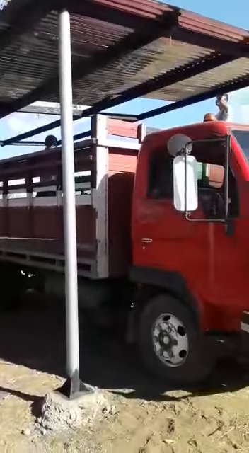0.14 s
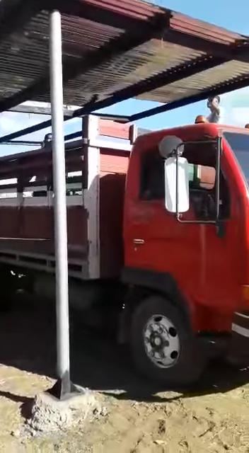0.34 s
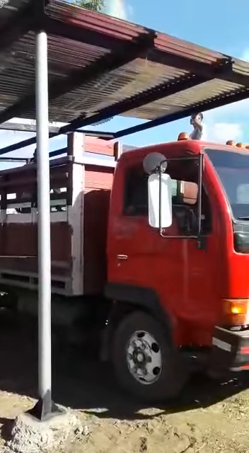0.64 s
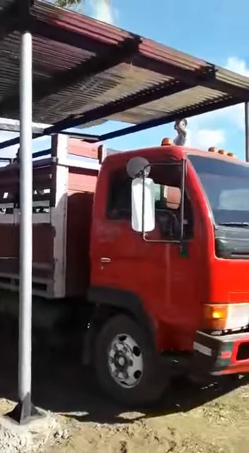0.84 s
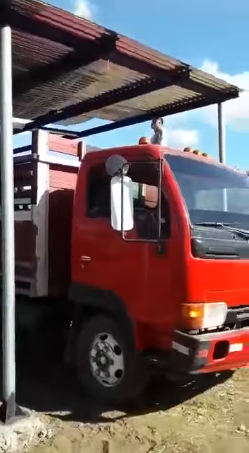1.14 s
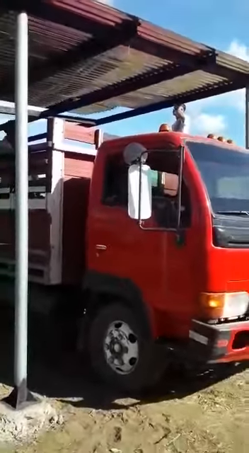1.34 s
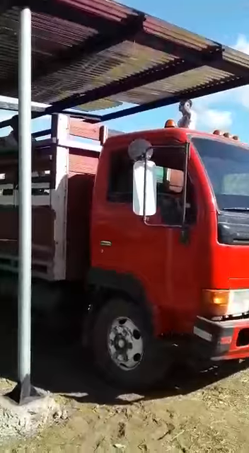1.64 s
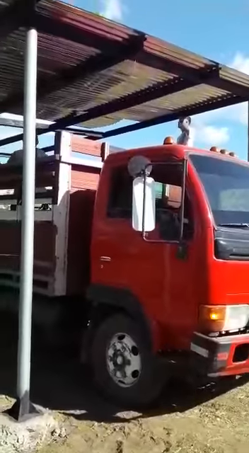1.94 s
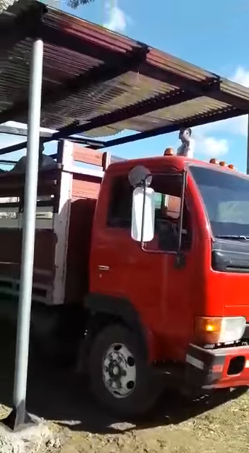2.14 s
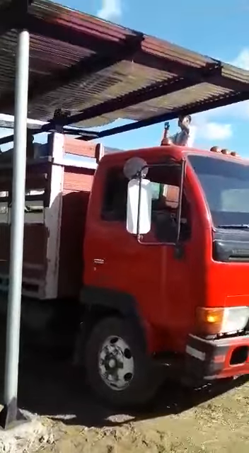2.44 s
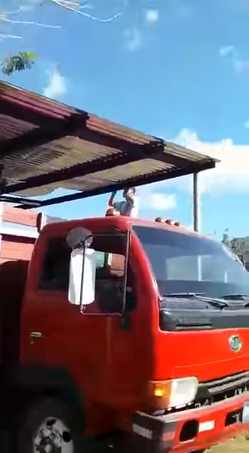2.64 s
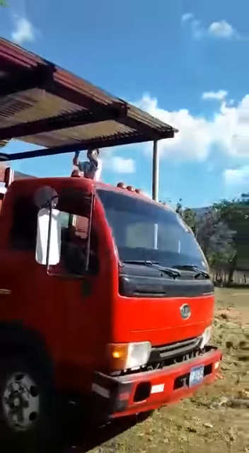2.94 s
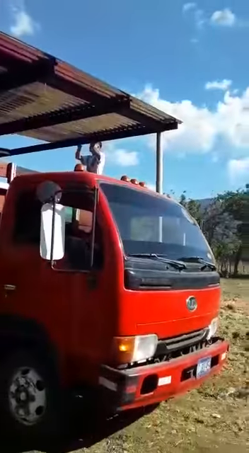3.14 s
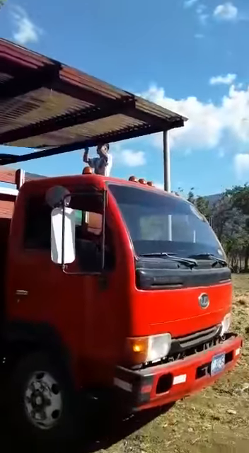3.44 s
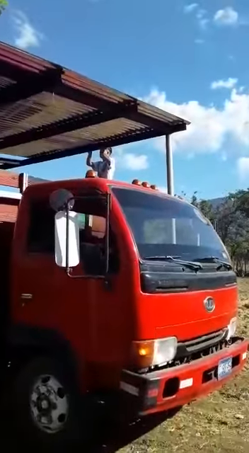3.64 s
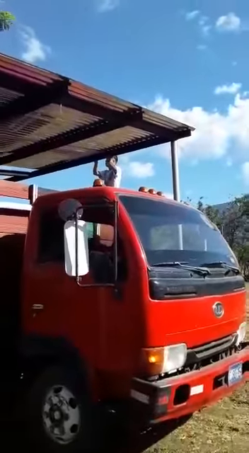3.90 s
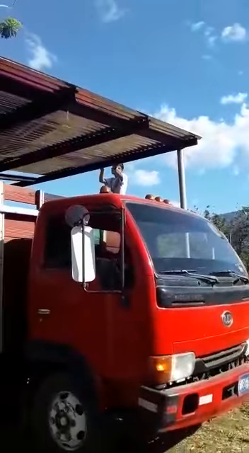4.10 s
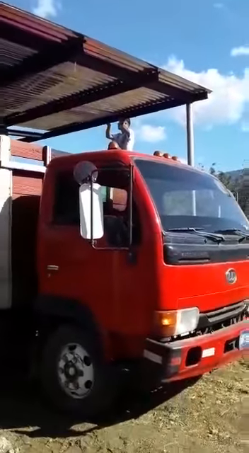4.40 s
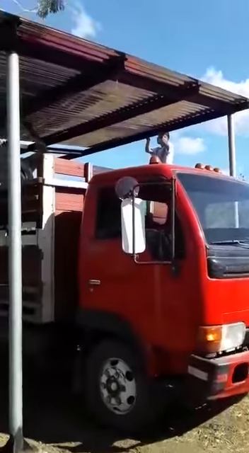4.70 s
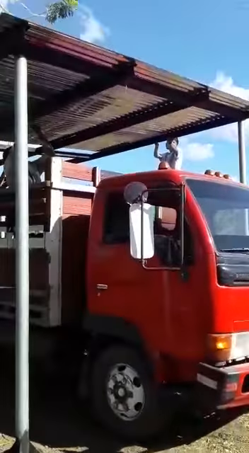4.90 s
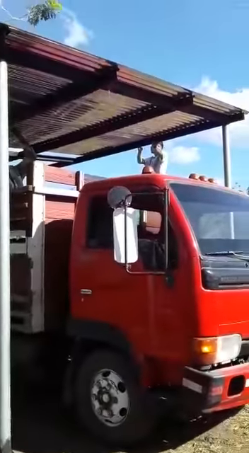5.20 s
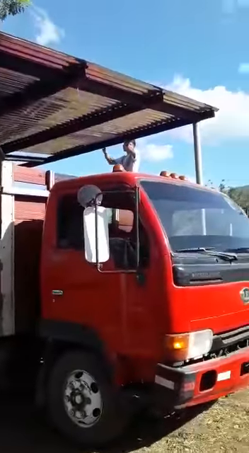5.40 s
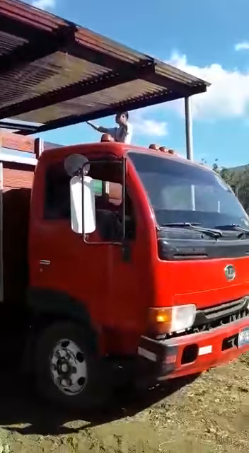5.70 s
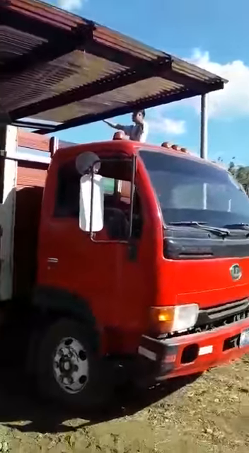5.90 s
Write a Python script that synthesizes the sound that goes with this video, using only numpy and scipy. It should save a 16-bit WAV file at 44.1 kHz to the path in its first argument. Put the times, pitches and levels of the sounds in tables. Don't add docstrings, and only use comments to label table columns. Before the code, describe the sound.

Outdoors, a truck's load drags raspily along corrugated metal with wind puffs, until a sheet buckles with a violent bang and clatters down.

```python
import sys
import numpy as np
from scipy import signal
from scipy.fft import irfft
from scipy.io import wavfile

SR = 44100
rng = np.random.default_rng(int(sys.argv[2]) if len(sys.argv) > 2 else 0)


def invert_db(level):
    return 10 ** (np.asarray(level, dtype=float) / 20)


def unload_audio(sound):
    columns = np.transpose(np.atleast_2d(sound))
    steps = np.round(np.clip(columns, -1, 1) * 32767)
    wavfile.write(sys.argv[1], SR, steps.astype(np.int16))


N = 266884
TIME = np.arange(N) / SR

# [peak t/s, level/dB, length/s]
GUSTS = [(0.0, -50, 0.88), (0.275, -45.5, 0.5), (0.43, -48, 0.098), (0.514, -47, 0.14), (0.9, -52.5, .6),
         (1.07, -43, 0.21), (1.433, -44.5, 0.29), (1.922, -40, 0.1), (2.1, -54.5, 0.19), (2.265, -51, 0.16),
         (2.507, -52.5, 0.061), (2.73, -57.5, 0.3), (2.922, -64, 0.18), (3.18, -66, .15),
         (3.417, -60.5, 0.43), (3.6, -40, 0.056), (4.2, -61, 1.1), (4.47, -60, 0.32), (4.67, -56.5, 0.28),
         (4.92, -61, 0.3), (5.138, -57, 0.3), (5.448, -54.5, 0.24), (5.747, -53, 0.17), (5.922, -50, 0.05),
         (5.975, -52, 0.15)]
# [t/s, level/dB]
BREEZE = [(0.0, -57), (0.55, -45), (0.7, -64), (1.14, -53), (1.8, -56), (2.28, -47), (2.6, -60), (3.5, -69),
          (4.4, -70.5), (4.7, -60), (5.4, -80), (6.05, -76)]
# [t/s, peak level/dB, f/Hz]
POPS = [(0.134, -34.5, 150), (0.164, -38, 150), (0.22, -37, 110), (0.286, -32, 220), (0.297, -32, 160),
        (0.42, -31, 150), (0.521, -31, 200), (1.878, -42, 240), (1.908, -32, 200), (2.066, -41, 110),
        (2.111, -39, 120), (2.175, -40, 139), (2.193, -42, 150), (2.26, -39, 110), (2.282, -37, 110),
        (2.324, -44, 130)]

# [t/s, peak level/dB, f/Hz]
PINGS = [(0.9, -36, 2730), (0.914, -34, 1385), (0.925, -29.5, 2690), (0.961, -35, 1700), (0.982, -29, 1667),
         (1.21, -36, 2180), (1.32, -32.5, 2190), (1.59, -41, 2260), (4.235, -48, 5540), (4.285, -45, 4250),
         (4.325, -51, 2130), (4.35, -45, 2700), (5.911, -53, 1830)]
# [t/s, peak level/dB, f/Hz]
HUMS = [
    (0.397, -32, 140),
    (1.0, -27, 261),
    (1.189, -40, 254),
    (1.71, -34.5, 270),
    (3.601, -20, 250),
    (3.602, -26, 156),
    (3.779, -20, 236),
]
# [t/s, peak level/dB, f/Hz]
KNOCKS = [(0.524, -30, 245), (0.54, -35, 300), (0.86, -30, 805), (1.505, -32.5, 800), (1.62, -32, 790),
          (0.999, -26, 730), (2.195, -49, 2060), (2.59, -48, 524), (3.355, -43, 560), (3.572, -37, 574),
          (3.597, -11.5, 905), (3.6, -9.5, 560), (4.619, -40, 520), (4.794, -41, 524), (5.119, -34.5, 587),
          (5.21, -35.5, 694), (5.629, -38, 537)]
# [t/s, peak level/dB, f/Hz]
SLAPS = [(1.067, -28, 7200), (1.292, -37, 5330), (1.598, -32, 2880), (2.965, -34, 3260), (3.11, -36, 7600),
         (3.15, -29.5, 3220), (3.243, -31, 3370), (3.462, -38, 3200), (3.609, -6, 4270),
         (3.616, -11.5, 4800), (3.647, -25, 7600), (3.815, -15, 4370), (3.956, -26.5, 4800),
         (4.088, -31, 7850), (4.447, -41, 3180)]
# [t/s, peak level/dB, f/Hz]
RATTLES = [
    (5.911, -30.5, 4260),
    (5.923, -33, 4400),
    (5.944, -37.5, 4400),
    (6.021, -42, 3900),
]
# [t/s, peak level/dB, f/Hz]
SPILLS = [
    (4.09, -37, 12940),
    (4.162, -50.5, 14500),
    (4.207, -39, 13800),
    (5.51, -52, 14500),
    (5.54, -48, 14000),
    (5.575, -42, 14500),
    (5.61, -49, 14000),
    (5.65, -48, 14500),
    (5.7, -52, 14500),
    (1.375, -38, 13500),
]
# [t/s, peak level/dB, f/Hz]
CLICKS = [
    (2.535, -48, 10600),
    (5.774, -32.5, 4150),
    (5.836, -35, 14000),
    (5.9114, -49, 3000),
    (5.97, -46, 9600),
    (6.005, -40, 9400),
]
# [t/s, peak level/dB, f/Hz]
CRACKS = [
    (2.6378, -28.5, 7800),
    (5.875, -37, 7700),
    (5.981, -39, 8600),
    (6.033, -44, 5150),
]
# [t/s, peak level/dB, f/Hz]
SHOWERS = [(0.6, -33, 8500), (1.293, -36, 8500), (1.372, -30, 10000), (4.517, -43, 10200),
           (0.325, -39, 9000), (0.716, -37, 9000), (2.901, -46, 11000), (3.241, -40, 8000),
           (4.46, -47, 7800), (4.778, -41, 10000), (4.865, -49, 8000)]
# [t/s, peak level/dB, f/Hz]
HOPS = [
    (0.0862, -45, 7040),
    (0.158, -50, 9000),
    (0.181, -54, 12000),
    (0.2284, -54, 12560),
    (2.7077, -59, 12000),
    (5.964, -45, 8000),
    (6.012, -48, 11500),
    (6.022, -46, 5960),
]
# [band width/octaves, t60/s]
BURST_KINDS = [(0.092, 0.19), (0.29, 0.17), (0.79, 0.08), (0.31, 0.16), (0.6, 0.031), (0.49, 0.14),
               (0.54, 0.003), (3.6, 0.0031), (1.7, 0.15), (0.64, .012), (1.4, 0.024)]
# [t/s, peak level/dB, f/Hz, t60/s]
SNAPS = [(3.594, -7, 560, .09), (3.618, -11, 610, .08), (3.638, -9, 720, .08), (3.648, -15.5, 245, 0.13),
         (3.651, -13, 560, .08), (3.63, -4, 3100, .01), (3.641, -2.5, 3000, .012), (3.674, -7, 3600, .006),
         (3.684, -7, 2100, .04), (3.686, -9, 3260, 0.045), (3.974, -31, 190, 0.15), (4.005, -27, 650, .08),
         (4.1, -32, 605, 0.086), (0.444, -28, 250, 0.032), (0.459, -37, 270, 0.035),
         (0.47, -28.5, 2390, .05), (0.543, -29.5, 300, 0.021), (0.553, -27, 2300, .02),
         (1.57, -32, 3200, .12), (1.631, -30, 3600, 0.18), (2.592, -38, 500, .04), (2.92, -38, 520, 0.073),
         (4.209, -40, 328, 0.068), (3.51, -42, 3000, .12), (3.53, -44, 560, .12), (1.022, -23, 780, .06),
         (1.055, -25, 850, .07), (3.62, -7, 3060, .07), (3.648, -7, 3040, .06), (5.915, -43, 140, .45),
         (3.3, -45, 12000, .18), (3.36, -50, 11500, .18), (1.145, -29.5, 480, 0.074),
         (3.83, -18.5, 740, .08)]

# [low f/Hz, high f/Hz]
REGIONS = [(80, 970), (970, 1950), (1950, 5000), (5000, 8950), (8950, 16000)]
BLENDS = [.1, .1, .1, .5, .05, .05]
# [f/Hz, width/Hz, level/dB]
PANEL = [(263, 26, 3), (560, 5.4, -1.5), (721, 30, -1.5), (1100, 120, 4.5), (2670, 120, 0.5),
         (3740, 200, 3)]
# [f/Hz, t60/s]
RING = [(150, 0.58), (500, 0.3), (1200, 0.42), (3000, 0.27), (8000, 0.26), (15000, 0.21)]

# [f/Hz, level/dB per Hz]
FIRST_SHEET_COLOUR = [(88, -45), (150, -8.5), (209, -15.5), (259, 0.5), (361, -11), (805, -2.5),
                      (1060, -13.5), (1480, -6.5), (1830, -11), (2270, -2.5), (3300, -11.5), (4600, -17.5),
                      (5680, -21), (6600, -14), (7920, -10.5), (8700, -19), (9820, -17.5), (12700, -13.5),
                      (16000, -19)]
# [f/Hz, level/dB per Hz]
SECOND_SHEET_COLOUR = [(120, -22), (200, 0.5), (358, -7.5), (534, 2), (630, -6), (702, 3.5), (923, -11.5),
                       (1150, -6.5), (1620, -10.5), (2130, -7), (3360, -4.5), (4400, -13), (6000, -14),
                       (7000, -13.5), (8000, -11), (9200, -18.5), (10300, -13.5), (12500, -13.5),
                       (15800, -16)]
# [peak t/s, rasp level/dB, rise/s, fall/s, grit level/dB re rasp]
FIRST_STROKES = [(0.0, -50, .01, 0.14, -23.5), (0.09, -55.5, .05, 0.13, -2), (0.17, -57, 0.14, 0.066, -16),
                 (0.264, -62, 0.031, 0.33, 2), (0.33, -49, 0.01, 0.2, -2), (0.38, -44, 0.17, 0.43, -25),
                 (0.449, -32.5, 0.0072, 0.093, -5), (0.5, -36, 0.2, 0.67, -8),
                 (0.615, -39.5, 0.098, 0.11, -4), (0.72, -46.5, 1, 0.96, 2), (0.864, -45, .006, .08, -4),
                 (0.96, -38.5, 0.31, 0.34, -5.5), (1.01, -34, 0.084, 0.26, -10.5),
                 (1.075, -35.5, 0.053, 0.2, -6), (1.2, -38, 0.11, 0.48, -7), (1.32, -38, .2, 0.21, -7),
                 (1.385, -34, 0.034, 0.37, -4.5), (1.601, -30.5, 0.18, 0.22, -6),
                 (1.95, -55, 0.32, 0.19, -20), (2.1, -66, 0.32, 0.19, -2), (2.197, -48, 0.015, 0.45, -17),
                 (2.29, -50.5, 0.031, 0.53, -2.5), (2.406, -58, 0.27, 0.4, -7),
                 (2.55, -53, 0.67, 0.16, -18)]
# [peak t/s, rasp level/dB, rise/s, fall/s, grit level/dB re rasp]
SECOND_STROKES = [(2.77, -56.5, 0.04, .3, -1.5), (2.85, -49, 0.095, 0.22, -3),
                  (2.908, -43.5, 0.06, 0.49, -5), (2.994, -41, 0.23, 0.35, -10.5),
                  (3.112, -39, 0.013, 0.33, -0.5), (3.154, -37.5, 0.043, 0.18, -1),
                  (3.247, -42.5, 0.074, 0.25, -5), (3.299, -53, 0.23, 0.23, -4),
                  (3.4, -47, 0.29, 0.16, -14.5), (3.466, -43.5, 0.009, 0.19, -14.5),
                  (3.566, -49, 0.075, 0.89, -13), (4.188, -41, 0.11, 0.16, -6.5), (4.21, -46, .1, 0.15, -1),
                  (4.3, -46, 0.21, 0.3, -7), (4.37, -54, .15, 0.36, -10), (4.465, -47, 0.048, 0.18, -5.5),
                  (4.53, -45, 0.057, 0.47, -4.5), (4.624, -39.5, 0.13, 0.34, -8.5),
                  (4.72, -47.5, 0.12, 0.15, -11), (4.8, -44, .06, 0.17, -5), (4.87, -47.5, 0.027, 0.16, -8),
                  (5.0, -58, 0.27, 0.09, -25), (5.084, -45, 0.059, 0.33, -6),
                  (5.42, -46.5, 0.14, 0.54, -14), (5.6, -50, 0.31, 0.35, -1.5), (5.77, -55, .5, 0.053, -7),
                  (5.88, -55.5, 0.13, 0.15, -4.5), (5.911, -45.5, 0.0067, 0.091, -10),
                  (6.0, -59, .2, 0.36, -1)]
# [t/s, peak level/dB]
SNAGS = [(0.257, -34), (0.324, -39.5), (0.4455, -26), (0.716, -27), (0.794, -30), (0.861, -24),
         (1.178, -33), (2.273, -39), (2.511, -46), (2.89, -36), (3.104, -31), (3.241, -32), (3.37, -36),
         (3.461, -39), (4.161, -22.5), (4.612, -34), (4.865, -44), (5.063, -49), (5.386, -33)]
# [peak t/s, level/dB, rise/s, fall/s]
JOLTS = [(0.0, -45.5, .01, 0.34), (0.33, -45, 0.19, 0.65), (0.455, -32, 0.028, 0.3), (0.7, -40, 0.77, 0.44),
         (1.005, -30.5, 0.01, 0.2), (1.06, -31, .05, .2), (1.2, -36, .04, 0.14), (1.25, -33.5, 0.45, 0.94),
         (1.55, -39.5, 0.51, 0.35), (1.725, -41.5, .05, 0.11), (1.82, -41.5, 0.15, 0.11),
         (1.91, -60, 0.041, 0.13), (1.999, -49, 0.17, 0.15), (2.3, -46.5, 0.12, 0.1),
         (2.51, -46, 0.17, 0.11), (2.62, -51, 0.13, 0.091), (2.93, -41.5, 0.13, 0.26),
         (3.17, -49, 0.083, 0.16), (3.39, -43.5, 0.065, 0.074), (3.565, -55, 0.13, 1.1),
         (4.19, -44, 1.87, 0.47), (4.5, -56, .3, .3), (4.63, -40, 0.025, 0.27), (4.76, -41.5, 0.34, 0.31),
         (5.0, -58, 0.23, 0.21), (5.1, -45.5, 0.055, 0.39), (5.23, -48.5, 0.29, 0.15),
         (5.45, -49.5, 0.21, 0.28), (5.64, -51, 0.072, 0.28), (5.9, -55, 0.18, 0.45)]
# [peak t/s, level/dB, rise/s, fall/s]
DUST_SLIDE = [
    (5.6, -63, 0.13, 0.26),
    (5.85, -81, 0.28, .7),
]
# [t/s, rib level/dB re rasp]
RIB_LEVEL = [(0.0, 0), (0.25, -5), (0.45, -5.5), (0.8, -6), (0.99, -4), (1.05, -6), (1.3, -8), (1.75, -11),
             (2.2, -4.5), (2.7, -11.5), (3.15, -12), (3.5, -9.5), (4.2, -9.5), (4.65, -8.5), (5.1, -8.5),
             (5.45, -3.5), (5.75, -6), (6.05, -4)]
# [t/s, beam level/dB]
BEAM_LEVEL = [(0.0, -1.5), (0.5, -1.5), (1.1, 0.5), (1.55, -2), (1.75, -2.5), (2.0, 0.5), (2.15, -9),
              (2.45, -3.5), (2.75, -3), (2.9, -1), (3.3, 1.5), (4.3, 0.5), (5.2, 1.5), (6.05, -4)]
BEAM_BAND = [190, 420]

# [f/Hz, level/dB per Hz]
CRASH_COLOUR = [(53, -67), (90, -17), (239, -3), (353, -8), (499, 0.5), (600, -0.5), (706, 2.5),
                (915, -12.5), (1160, -5.5), (1440, -10.5), (1800, -11.5), (2150, -6), (2760, -4),
                (3400, -3.5), (3910, -7.5), (4600, -13.5), (6870, -16.5), (8000, -15.5), (9930, -26.5),
                (16000, -26.5)]
# [peak t/s, force level/dB, rise/s, fall/s, boom level/dB re force]
FOLDS = [(3.5859, -8.5, .0007, 0.025, 7.5), (3.5963, -3, 0.0032, 0.0072, 7),
         (3.614, -9.5, 0.015, 0.065, 6.5), (3.645, -5.5, 0.049, 0.099, 2), (3.665, -9, .02, 0.054, -10),
         (3.69, -6, 0.068, 0.053, -4.5), (3.724, -7, 0.11, 0.028, 1.5), (3.757, -14, 0.018, 0.042, 1.5),
         (3.79, -16, .1, 0.078, 2.5), (3.817, -14.5, 0.023, 0.082, 5), (3.87, -21.5, 0.15, 0.17, 5),
         (3.96, -22.5, 0.076, 0.04, 3), (4.08, -33.5, 0.33, 0.065, 3.5), (4.15, -45.5, 0.11, 0.33, 9)]
# [f/Hz, level/dB, t60/s]
FREE_MODES = [(513, -10.5, 0.68), (1194, -18, 0.36), (1220, -22, 5.0), (2061, -3.5, 0.12),
              (2395, -27.5, 0.27), (2710, -16.5, 0.69), (2890, -19, 0.26), (3050, -28, 0.81),
              (3163, -22, 0.5), (3690, -19, 0.51), (3520, -25.5, 1.4), (3920, -24, 0.9), (4500, -24, 0.31),
              (4770, -27, 0.39)]

NEXT_SHEET_S, FIRST_SNAG_S = 2.68, 0.257


def rms_one(x):
    return x / np.sqrt(np.mean(x ** 2) + 1e-20)


def in_time(rows):
    s, *columns = np.transpose(rows)
    return [np.interp(TIME, s, column) for column in columns]


def at_hz(points, hz):
    f, value = np.transpose(points)
    return np.interp(np.log(hz), np.log(f), value)


def drift(hz):
    r = np.exp(-2 * np.pi * hz / SR)
    wander = signal.lfilter([1], [1, -2 * r, r * r], rng.standard_normal(N + SR))
    return rms_one(wander[SR:])


def swells(s, db, rise_s, fall_s):
    roundness = 1.034
    coarse = TIME[::16]
    late = coarse - s[:, None]
    away = np.where(late < 0, -late / rise_s[:, None], late / fall_s[:, None])
    power = invert_db(2 * (db[:, None] - 20 * np.minimum(away, 8) ** roundness))
    return np.interp(TIME, coarse, np.sqrt(power.sum(axis=0)))


def wind():
    s, db, length_s = np.transpose(GUSTS)
    breeze = invert_db(in_time(BREEZE)[0])
    noise = rng.standard_normal((2, N)) * invert_db(2.3 * drift(35))
    puff_band = signal.butter(2, [85, 200], "band", fs=SR, output="sos")
    buffet_band = signal.butter(2, [50, 90], "band", fs=SR, output="sos")
    puffs = rms_one(signal.sosfilt(puff_band, noise[0]))
    buffet = rms_one(signal.sosfilt(buffet_band, noise[1]))
    lull_db = -14
    puff_level = swells(s, db, length_s, 0.79 * length_s) + invert_db(lull_db) * breeze
    return puff_level * puffs + breeze * buffet


def bursts(rows, octaves):
    length = 8192
    out = np.zeros(N + length)
    for s, db, hz, t60 in rows:
        noise = rng.standard_normal(length) * invert_db(-60 * TIME[:length] / t60)
        edges = np.minimum(hz * 2 ** (octaves * np.array([-.5, .5])), [15000, 16200])
        burst = signal.sosfilt(signal.butter(2, edges, "band", fs=SR, output="sos"), noise)
        out[round(s * SR):][:length] += invert_db(db) * burst / np.abs(burst).max()
    return out[:N]


def small_blows():
    kinds = [PINGS, HUMS, KNOCKS, SLAPS, RATTLES, SPILLS, CLICKS, CRACKS, SHOWERS, HOPS, POPS]
    out = np.zeros(N)
    for rows, (octaves, t60) in zip(kinds, BURST_KINDS):
        out += bursts([(s, db, hz, t60) for s, db, hz in rows], octaves)
    return out


def snaps():
    return bursts(SNAPS, octaves=0.49)


def contacts(per_s, spread_db):
    sizes = invert_db(spread_db * np.minimum(rng.exponential(1, N), 4)) * rng.choice([-1, 1], N)
    return rms_one(sizes * (rng.random(N) < per_s / SR))


def mode(drive, hz, t60):
    r, w = invert_db(-60 / (t60 * SR)), 2 * np.pi * hz / SR
    return signal.lfilter([0, np.sin(w)], [1, -2 * r * np.cos(w), r * r], drive + 1e-18)


def sheet(colour, damping, size):
    hz, t = (np.arange(size // 2 + 1) + 1) * SR / size, np.arange(size) / SR
    lift_db = sum(db / (1 + (2 * (hz - f) / width) ** 2) for f, width, db in PANEL)
    shape = invert_db(at_hz(colour, hz) + lift_db)
    regions = []
    for (low, high), below, above in zip(REGIONS, BLENDS, BLENDS[1:]):
        inner = np.minimum(np.log(hz / low) / below, np.log(high / hz) / above)
        fade = np.sqrt(np.clip(inner + .5, 0, 1))
        bands = 1 + round(2 * np.log2(high / low))
        edges = np.geomspace(low / np.exp(below / 2), high * np.exp(above / 2), bands + 1)
        t60 = at_hz(RING, np.sqrt(edges[1:] * edges[:-1]))[:, None] / damping
        inside = (hz >= edges[:-1, None]) * (hz < edges[1:, None])
        regions.append((inside * shape * fade, invert_db(-60 * t / t60) / np.sqrt(t60)))
    while True:
        modes = rng.standard_normal(len(hz)) + 1j * rng.standard_normal(len(hz))
        rings = np.array([np.sum(irfft(modes * part, size) * decay, axis=0) for part, decay in regions])
        yield rings / np.sqrt(np.sum(rings ** 2, axis=1, keepdims=True))


def strike(places, force, regions_db, span):
    count = 10
    first, last = round(span[0] * SR), round(span[1] * SR)
    drive = (force * invert_db(regions_db))[:, first:last]
    place = rng.integers(0, count, last - first)
    out = np.zeros(N + SR)
    for k in range(count):
        rung = signal.fftconvolve(drive * (place == k), next(places), axes=1).sum(axis=0)
        out[first:first + len(rung)] += rung
    return out[:N]


def flecks(pressure):
    born = contacts(120, 1.8) * pressure
    pitches = np.geomspace(600, 7500, 20)
    pitch = rng.integers(0, len(pitches), N)
    out = np.zeros(N)
    for k, hz in enumerate(pitches):
        out += mode(born * (pitch == k), hz, t60=.09) * invert_db(at_hz(FIRST_SHEET_COLOUR, hz))
    return invert_db(-26.5) * out


def rubbing():
    s, db, rise_s, fall_s, grit_db = np.transpose(FIRST_STROKES + SECOND_STROKES)
    rasp = swells(s, db, rise_s, fall_s) + invert_db(-86.5)
    grit = swells(s, db + grit_db, rise_s, fall_s) + invert_db(-112)
    dust_db = 1.09 * (db + 39.5) - 38.5 - 3.5 * (s > NEXT_SHEET_S) - 6.5 + 0.88 * grit_db
    dust = swells(s, dust_db, rise_s, fall_s * 0.79) + invert_db(-89)
    dust += swells(*np.transpose(DUST_SLIDE))
    before_snag = TIME < FIRST_SNAG_S
    dust *= invert_db(-9.5 * before_snag)
    grit *= invert_db(-6 * before_snag)
    boom = swells(*np.transpose(JOLTS)) + invert_db(-107)
    boom_db, grit_db, dust_db = 20 * np.log10([boom, grit, dust] / rasp)

    pressure = rasp * invert_db(.9 * drift(45))
    for s, db in SNAGS:
        pressure += invert_db(db - 20.5) * (TIME >= s) * np.exp(-np.abs(TIME - s) / 0.016)
    force = pressure * contacts(8000, 2.84)
    regions_db = [boom_db + 1.1 * drift(19),
                  in_time(RIB_LEVEL)[0] + 0.95 * drift(9.9),
                  -1 + 0.96 * drift(8.8),
                  grit_db + 0.86 * drift(22),
                  dust_db + 1.4 * drift(30)]
    first_sheet = sheet(FIRST_SHEET_COLOUR, damping=6.9, size=8192)
    second_sheet = sheet(SECOND_SHEET_COLOUR, damping=5.2, size=8192)
    early = strike(first_sheet, force, regions_db, (0, NEXT_SHEET_S))
    late = strike(second_sheet, force, regions_db, (NEXT_SHEET_S, N / SR))
    return early + late + flecks(pressure)


def on_frame(x):
    beam = signal.lfilter(*signal.butter(1, BEAM_BAND, "band", fs=SR), x)
    edge = signal.lfilter(*signal.butter(1, [2700, 4300], "band", fs=SR), x)
    beam_change = invert_db(in_time(BEAM_LEVEL)[0]) - 1
    edge_change = invert_db(-4.5 * (TIME < FIRST_SNAG_S)) - 1
    return x + beam_change * beam + edge_change * edge


def free_ring(force):
    first, last = round(3.58 * SR), round(4.9 * SR)
    out = np.zeros(N)
    for hz, db, t60 in FREE_MODES:
        share = rng.random(last - first) < .3
        out[first:last] += invert_db(db) * mode(force[first:last] * share, hz, min(t60, 1.2))
    return invert_db(-29) * out


def crash():
    s, db, rise_s, fall_s, boom_db = np.transpose(FOLDS)
    folds = swells(s, db, rise_s, fall_s)
    boom_db = 20 * np.log10(swells(s, db + boom_db, rise_s, fall_s) / folds)
    folding = folds * (TIME > s[0] - 2 * rise_s[0])
    force = folding * invert_db(-6 + 2.6 * drift(44)) * contacts(2500, 3.64)
    steady = np.zeros(N)
    regions_db = [boom_db - 4.5, -7.5 + 0.29 * boom_db, steady - 0.8, steady - 9, steady - 17.5]
    loose_sheet = sheet(CRASH_COLOUR, damping=0.77, size=16384)
    return strike(loose_sheet, force, regions_db, (3.58, 4.6)) + free_ring(force)


def scene():
    thin = signal.butter(3, 130, "high", fs=SR, output="sos")
    roof = signal.sosfilt(thin, on_frame(rubbing()) + crash())
    return (wind() + small_blows() + snaps() + roof)[None]


def roll_off(x):
    return signal.sosfilt(signal.butter(12, 16620, fs=SR, output="sos"), x)


def record(dry):
    ceiling = 1.45
    bass_cut = signal.butter(2, 55, "high", fs=SR, output="sos")
    top_cut = signal.ellip(10, .5, 48, 15780, fs=SR, output="sos")
    rounded = ceiling * np.tanh(signal.sosfilt(bass_cut, dry) / ceiling)
    mix = np.clip(signal.sosfilt(top_cut, rounded), -1, 1)
    return roll_off(mix)


dry = scene()
out = record(dry)
unload_audio(out)
```